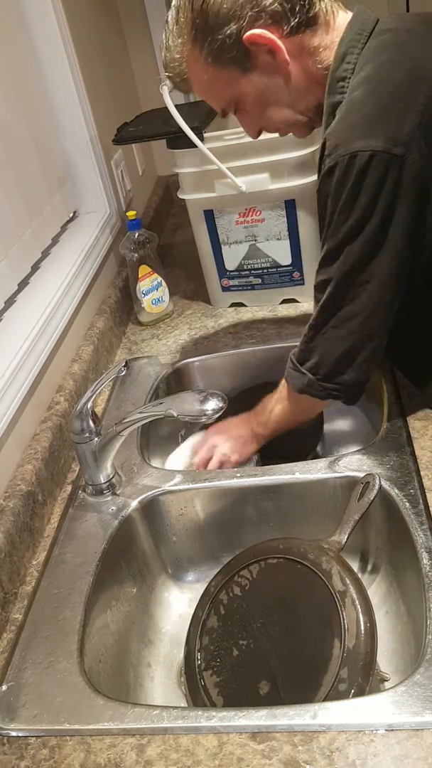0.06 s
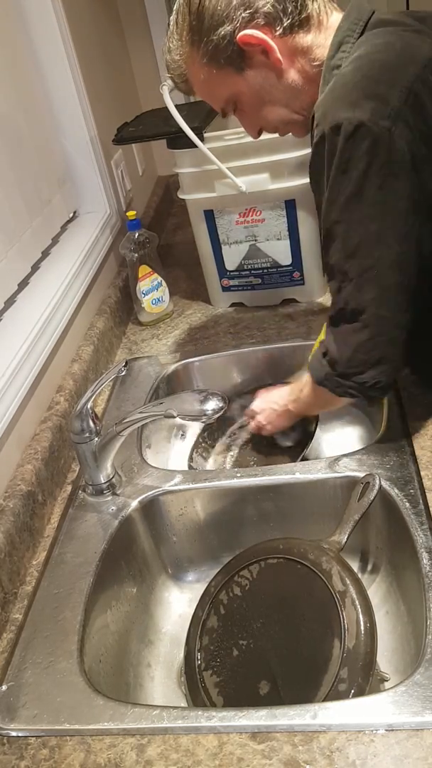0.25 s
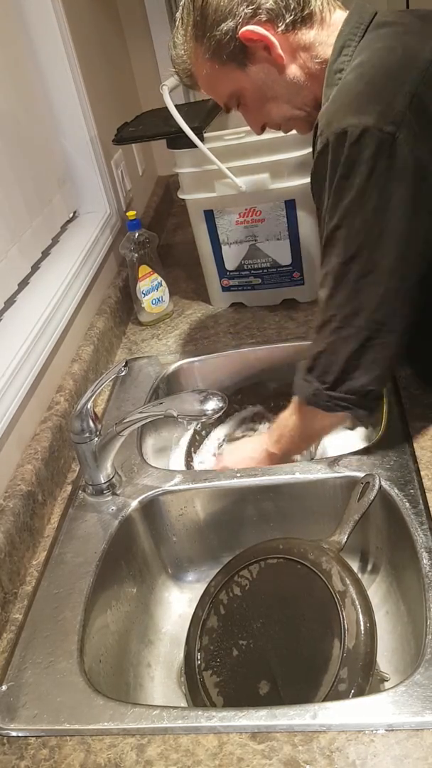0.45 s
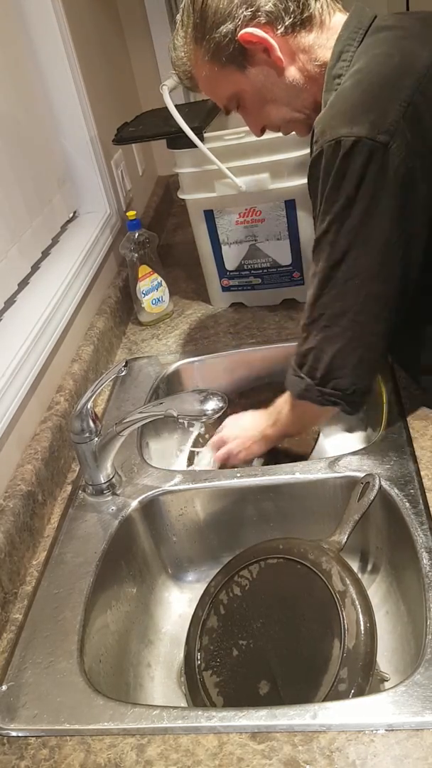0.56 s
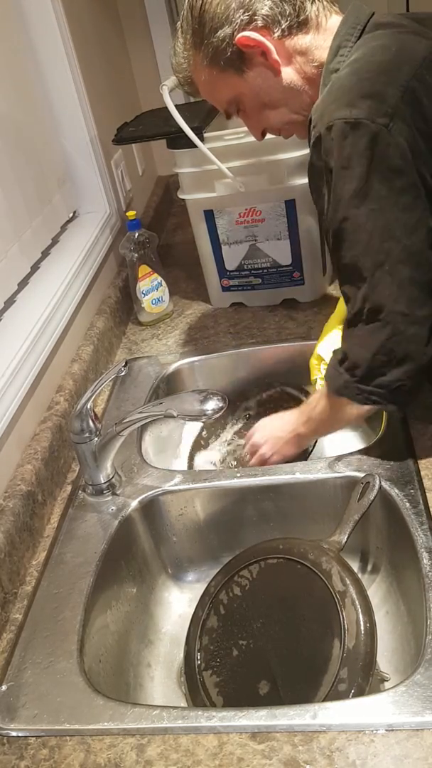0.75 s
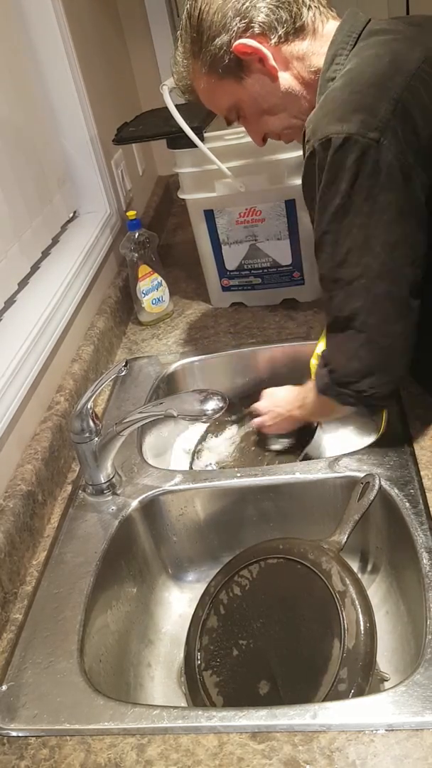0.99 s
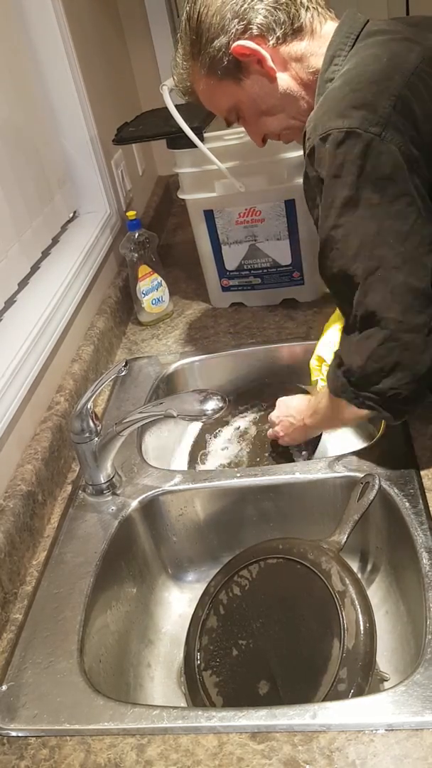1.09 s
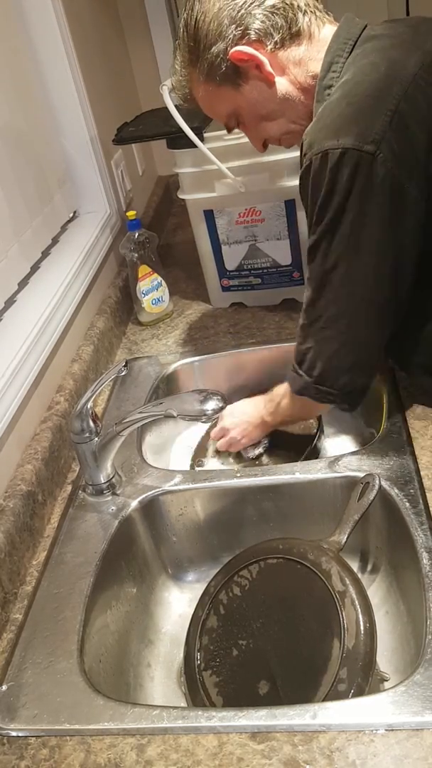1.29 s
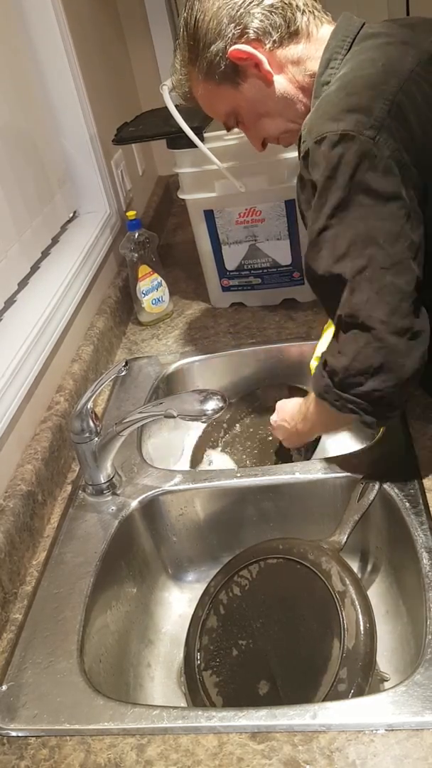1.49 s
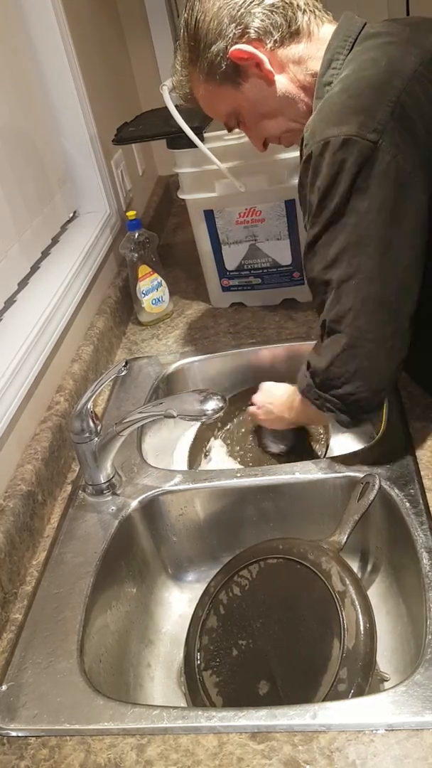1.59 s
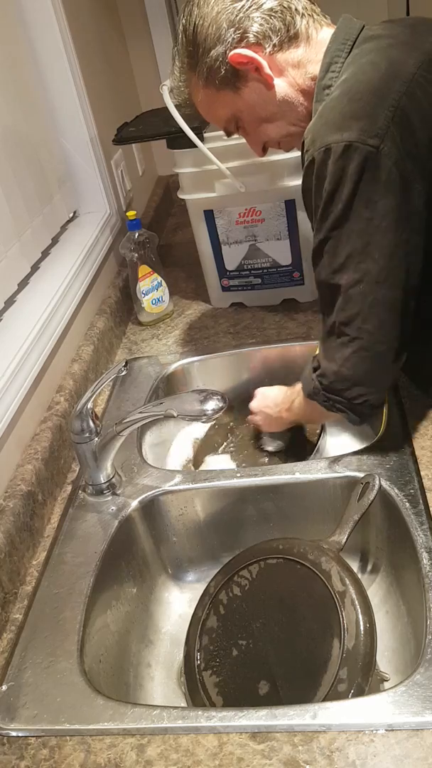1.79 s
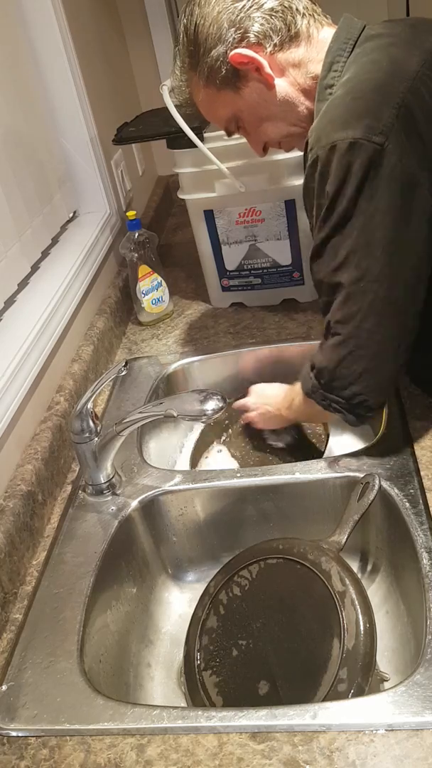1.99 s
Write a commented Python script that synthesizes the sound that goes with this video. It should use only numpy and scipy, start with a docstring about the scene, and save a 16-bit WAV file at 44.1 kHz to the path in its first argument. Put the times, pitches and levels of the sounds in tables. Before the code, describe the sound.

A cast iron pan is scrubbed hard with a wire pad, knocking in a steel sink

```python
"""A cast iron pan is scoured by hand with a wire pad in a steel kitchen sink, heard in stereo for two seconds.
Two weak strokes come first, over a low rumble; near the end of the first one the pan starts to knock
on the basin. Stronger strokes then hiss back and forth: random wire clicks, filtered and swelled stroke by
stroke. Knocks go on as decaying contacts that ring the basin and its clatter, with swelling low sines as the
boom. After the last knock, strokes and rumble remain while room echoes and boom die away."""
import sys
import numpy as np
from scipy import signal
from scipy.fft import rfft, irfft, next_fast_len
from scipy.io import wavfile

SR = 44100
rng = np.random.default_rng(int(sys.argv[2]) if len(sys.argv) > 2 else 0)


def boost(x):
    """Linear amplitude factor 10**(x/20) for a level x in decibels (scalar or array-like)."""
    u = np.asarray(x, float) / 20
    return 10 ** u


def store_wav(level_fs):
    """Save 16-bit WAV to argv[1]."""
    pcm = np.round(np.clip(np.atleast_2d(level_fs), -1, 1) * 32767)
    wavfile.write(sys.argv[1], SR, pcm.T.astype(np.int16))


N = 90404   # samples
HZ = np.fft.rfftfreq(N, 1 / SR) + 1   # frequency grid, shifted 1 Hz to keep clear of log(0)
LEFT_RIGHT = np.array([[1], [-1]])


def rms_one(x):
    """Scales to rms 1."""
    return x / np.sqrt(np.mean(x ** 2) + 1e-20)


def in_time(rows):
    """Interpolates the columns of a table of times, sample by sample."""
    seconds, *columns = np.transpose(rows)
    return [np.interp(np.arange(N) / SR, seconds, column) for column in columns]


def at_hz(points):
    """Interpolates a table of frequencies over log frequency."""
    hz, values = np.transpose(points)
    return np.interp(np.log(HZ), np.log(hz), values)


def drift(rate_hz):
    """Random wander of rms 1: noise through a two-pole lowpass, drawn at every 40th sample."""
    r = np.exp(-2 * np.pi * rate_hz * 40 / SR)
    noise = rng.standard_normal(N // 40 + 2002)
    slow = signal.lfilter([1], [1, -2 * r, r * r], noise)[2000:]   # settled part
    return np.interp(np.arange(N) / 40, np.arange(len(slow)), rms_one(slow))


def grains(rate_per_s, spread_db):
    """Two unrelated streams of random clicks of uneven size and either sign."""
    sizes = boost(spread_db * np.minimum(rng.exponential(1, (2, N)), 5))
    sizes = sizes * rng.choice([-1, 1], (2, N))
    return rms_one(sizes * (rng.random((2, N)) < rate_per_s / SR))


def causal(spectrum):
    """Minimum-phase response for a spectrum in dB, by folding its cepstrum."""
    cepstrum = irfft(at_hz(spectrum) * np.log(10) / 20, N)
    cepstrum[1:N // 2] *= 2
    cepstrum[N // 2 + 1:] = 0
    return np.exp(rfft(cepstrum))


# How alike left and right sound. Each row: frequency in Hz, likeness from 0 to 1.
LEFT_RIGHT_LIKENESS = [(60, .99), (130, 0.53), (300, 1), (600, 0.74), (1500, 0.21), (4000, 0.2),
                       (12000, 0.022)]


def colour(pair, spectrum):
    """Filters two streams to a spectrum and mixes them as middle and side to set the stereo width."""
    mid, side = rfft(pair) * causal(spectrum)
    alike = np.clip(at_hz(LEFT_RIGHT_LIKENESS), 0, 1)
    return irfft(np.sqrt(1 + alike) * mid + np.sqrt(1 - alike) * side * LEFT_RIGHT, N)


# Spectrum of the dragged and pressed pan. Each row: frequency in Hz, density in dB per Hz (relative).
RUMBLE_SPECTRUM = [(15, -30), (25, 16), (146, 2), (189, -6.5), (260, 13.5), (306, 1), (629, -2),
                   (784, -5.5), (1100, -1.5), (1220, -5), (3000, -14), (3900, -23), (6600, -120)]


def rumble():
    """The pan is dragged and pressed on the basin: low filtered noise with a slightly wandering level."""
    level_db = -50 + 1.03 * drift(8.4)
    return boost(level_db) * rms_one(colour(rng.standard_normal((2, N)), RUMBLE_SPECTRUM))


# The basin floor flexes under the load.
# Each row: time in seconds, low mode in dB, second mode in dB, sway in dB (rms before flutter and pan).
FLOOR_FLEXING = [(0.0, -49.5, -44, -45.5), (0.1, -52.5, -70, -52), (0.222, -50, -58, -52),
                 (0.24, -41, -21.5, -26), (0.28, -25.5, -46, -40), (0.34, -37, -30, -44),
                 (0.38, -39, -38.5, -32), (0.44, -38.5, -53, -61), (0.51, -38.5, -49, -37),
                 (0.59, -50.5, -52, -67), (0.71, -71, -70, -59), (0.736, -31, -27, -51),
                 (0.8, -40, -37, -37), (0.83, -28.5, -54, -54), (0.86, -29.5, -36.5, -39),
                 (0.95, -40.5, -64, -62), (1.058, -70, -55, -62), (1.078, -48, -27.5, -39),
                 (1.13, -30.5, -36, -42), (1.17, -27.5, -44, -58), (1.25, -28, -54, -58),
                 (1.3, -44, -57, -66), (1.41, -59, -50.5, -50), (1.44, -39, -45, -58),
                 (1.472, -23, -33.5, -50), (1.51, -53, -44.5, -30), (1.57, -26, -39.5, -46),
                 (1.64, -40.5, -39.5, -35), (1.725, -44, -55, -62), (1.77, -43, -57.5, -59),
                 (2.05, -62.5, -59, -58)]


def boom():
    """The lowest modes of the basin swell as the pan rocks: sines wavering a little in pitch and level."""
    LOW_HZ, SECOND_HZ, SWAY_HZ = 71.1, 130.1, 47.5
    PITCH_WAVER, FLUTTER_DB = 0.024, 2.2   # waver as a share of the frequency
    pans_db = (0, -3, 0)   # left minus right
    out = 0
    for level_db, hz, pan_db in zip(in_time(FLOOR_FLEXING), (LOW_HZ, SECOND_HZ, SWAY_HZ), pans_db):
        level = boost(level_db + pan_db / 2 * LEFT_RIGHT + FLUTTER_DB * drift(25.0))
        phase = 2 * np.pi * np.cumsum(hz * (1 + PITCH_WAVER * drift(5.86))) / SR
        out = out + np.sqrt(2) * level * np.sin(phase)
    return out


def kitchen(x):
    """The room answers: 16 feedback delays, eight per side, each duller on every round."""
    T60_S, WALL_CUT_HZ = 0.48, 1280   # longest decay, at low frequencies
    size = next_fast_len(N + SR)
    w = 2 * np.pi * np.fft.rfftfreq(size)   # radians per sample
    wall = 1 / (1 + 1j * w * SR / (2 * np.pi * WALL_CUT_HZ))
    out = np.zeros((2, len(w)), complex)
    for k, lag in enumerate(rng.uniform(0.0096, 0.03, 16) * SR):
        loop = boost(-60 * lag / SR / T60_S) * wall * np.exp(-1j * w * lag)
        out[k % 2] += loop / (1 - loop) * (-1) ** (k // 2)
    echoes = irfft(out * rfft(x, size), size)[:, :N]
    return signal.sosfilt(signal.butter(2, 450.0, "high", fs=SR, output="sos"), echoes)


def ring(x, hz, t60_s):
    """A two-pole resonator: a unit click sets a decaying sine of starting height 1 ringing."""
    r, w = boost(-60 / (t60_s * SR)), 2 * np.pi * hz / SR
    return signal.lfilter([0, np.sin(w)], [1, -2 * r * np.cos(w), r * r], x + 1e-18)


# Modes of pan and basin. Each entry: frequency in Hz.
MODE_HZ = [105, 160, 226, 258, 317, 375, 436, 472, 528, 609, 711, 855, 958, 1000, 1110, 1272, 1555, 1770,
           2050]
# The same modes in order. Each row: level in dB (relative), t60 in seconds, left minus right in dB.
MODE_RINGING = [(-8, 0.29, 6), (-2, 0.033, 5), (-14.5, 0.31, 0.5), (-11.5, 0.16, -1), (-4.5, 0.17, 2.5),
                (-22.5, 0.067, 12), (-9, 0.1, -5), (-14, 0.098, -4), (-18.5, 0.081, 17), (-10, 0.15, -6.5),
                (-18, 0.027, 20.5), (-17, 0.033, -21.5), (-18, 0.058, 7), (-22.5, 0.15, -6),
                (-19, 0.067, -9.5), (-21, 0.092, 17), (-26, 0.076, -20), (-26.5, 0.04, 16),
                (-25, 0.024, -17)]


def ringing_modes(drive):
    """Pan and basin ring at their modes; the side stream leans in opposite directions on successive modes."""
    out = 0
    for k, (hz, (db, t60_s, pan_db)) in enumerate(zip(MODE_HZ, MODE_RINGING)):
        lean = min(hz / 1090.0, 1) * (-1) ** k   # wider towards the treble
        mid, side = ring(drive, hz, t60_s)
        out = out + boost(-27.5 + db + pan_db / 2 * LEFT_RIGHT) * (mid + lean * side * LEFT_RIGHT)
    return out


# Pan knocks on the basin. Each row: start in seconds, driving level in dB, rattle t60 in seconds,
# brightness in dB, rise time constant in seconds, crack in dB relative to the driving level.
PAN_KNOCKS = [(0.2316, -17, 0.064, 4, 0.0035, -24), (0.245, -22.5, 0.14, 6, 0.0095, -44),
              (0.302, -29.5, 0.24, -1, 0.0014, -40), (.435, -29, 0.1, -5, 0.0094, -30),
              (0.719, -21, 0.19, 3, 0.0041, -19.5), (.785, -27.5, 0.15, 5, 0.0052, -17.5),
              (0.855, -36, 0.044, -23, 0.0052, -28), (1.068, -19, 0.14, 1.5, 0.0035, -25),
              (1.139, -24.5, 0.18, 1, 0.0087, -11.5), (1.258, -39, 0.073, -11, 0.0048, -25),
              (1.422, -26, 0.13, 0.5, 0.0053, -26), (1.455, -29, 0.13, -18, 0.011, -9),
              (1.526, -28.5, 0.2, -2, 0.008, -32), (1.547, -45.5, 0.13, 16.5, 0.014, -29),
              (1.598, -27, 0.085, -2.5, 0.0087, -13), (1.741, -29.5, 0.12, -10, 0.014, -31)]
# Unpitched part of a knock. Each row: frequency in Hz, density in dB per Hz (relative).
CLATTER_SPECTRUM = [(20, -41), (40, -14), (130, -5.5), (200, -4.5), (330, -5), (600, -6), (700, -51.5),
                    (880, -8), (1000, -14.5), (1400, -30), (2500, -24), (9000, -64), (16000, -39)]


def knocks(stroke_gains):
    """A hard first contact, a crack and a dying rattle ring modes and clatter; the pad stirs modes faintly."""
    RATTLE_PER_S, RATTLE_SPREAD_DB = 500, 1.9
    FIRST_CONTACT, CRACK_T60_S = 4.3, 0.16
    CLATTER_DB, PAD_INTO_MODES_DB = -11, -6.5
    t = np.arange(N) / SR
    contacts = grains(RATTLE_PER_S, RATTLE_SPREAD_DB) + 0.25 * rng.standard_normal((2, N))
    first = (np.array(PAN_KNOCKS)[:, 0] * SR).astype(int) + 110   # 2.5 ms into the rise
    contacts[:, first] = FIRST_CONTACT * np.array([[1], [0.3]])
    dull = signal.lfilter([0.1], [1, -0.9], contacts)
    bright = contacts - dull

    force, crack = np.zeros((2, N)), np.zeros(N)
    for start, db, t60_s, bright_db, rise_s, crack_db in PAN_KNOCKS:
        age = np.maximum(t - start, 0)
        rise = 1 - np.exp(-age / max(rise_s, 3e-4))
        decay = boost(db - 60 * age / max(t60_s, 0.01))
        force += decay * rise * (dull + boost(bright_db) * bright)
        crack += boost(db + crack_db - 60 * age / CRACK_T60_S) * rise

    coarse_gain = stroke_gains[2]
    drive = force + boost(PAD_INTO_MODES_DB) * coarse_gain * rng.standard_normal((2, N))
    modes = ringing_modes(drive)
    scale = np.sqrt(np.mean(boost(at_hz(CLATTER_SPECTRUM)) ** 2))
    clatter = boost(CLATTER_DB) / scale * colour(force, CLATTER_SPECTRUM)
    # the crack has the spectrum of wire on iron
    crack_noise = rms_one(colour(rng.standard_normal((2, N)), SCOUR_SPECTRUM))
    return modes + clatter + crack * crack_noise


# Strokes of the pad. Each row: start in seconds, end in seconds, level in dB, fine hiss in dB
# and coarse rasp in dB (both relative to that level), fastest moment as a share of the stroke.
PAD_STROKES = [(0.028, 0.254, -70, -2, 21, 1), (0.253, 0.456, -55.5, 7, 8, 1),
               (0.421, 0.639, -41, 0.8, -6.5, 0.65), (0.592, 0.713, -47.5, -2.5, 1, 0.56),
               (0.687, 0.79, -47.5, 3, 3.5, 0.37), (0.75, 1.061, -42.5, 0, 0, 0.32),
               (1.034, 1.127, -47.5, 6, 3.5, 0.51), (1.09, 1.246, -46.5, 1, 8, 0.38),
               (1.241, 1.44, -42, 2, -0.4, 0.26), (1.438, 1.655, -42.5, 1.3, -0.5, 0.3),
               (1.643, 1.85, -41.5, 5, 0.5, 0.49), (1.847, 2.043, -44, 4, -2.5, 0.32)]


def pad_strokes():
    """Each stroke speeds up and slows to a halt; returns gains of the middle, fine and coarse bands."""
    RESTING_DB = -54.5
    # exponents of the swell: the fine hiss needs speed, so it swells more narrowly
    fullness = np.array([[0.52], [0.82], [0.52]])
    t = np.arange(N) / SR
    power = np.full((3, N), boost(RESTING_DB) ** 2)
    for start, end, db, fine_db, coarse_db, fastest in PAD_STROKES:
        peak = start + np.clip(fastest, 0.05, 0.95) * (end - start)
        part = np.interp(t, [start, peak, end], [0, 0.5, 1])
        swell = np.abs(np.sin(np.pi * part)) ** fullness
        moving = (part > 0) * (part < 1)
        level = boost(db + np.array([[0], [fine_db], [coarse_db]]))
        power += (level * swell * moving) ** 2
    return np.sqrt(power)


# Spectrum of wire on iron. Each row: frequency in Hz, density in dB per Hz (relative).
SCOUR_SPECTRUM = [(590, -39), (1000, -39), (1160, -13), (1320, -2), (1580, -3), (2060, -0.5), (2230, -4),
                  (2530, -0.5), (2840, -2), (3490, -2.5), (4760, -3.5), (5920, -0.5), (8250, -21.5),
                  (9360, -9), (15500, -14)]


def scouring(stroke_gains):
    """Thousands of wire tips catch on the iron; each stroke has its own balance of fine and coarse."""
    GRAINS_PER_S, GRAIN_SPREAD_DB, FLICKER_DB = 9000, 0.8, 1.1
    FINE_HZ, COARSE_HZ = 6400, 2800   # edges of the fine hiss and the coarse rasp
    whole = rfft(rms_one(colour(grains(GRAINS_PER_S, GRAIN_SPREAD_DB), SCOUR_SPECTRUM)))
    fine = 1 / (1 + (FINE_HZ / HZ) ** 8)
    coarse = 1 / (1 + (HZ / COARSE_HZ) ** 4)
    out = 0
    for share, gain in zip((1 - fine - coarse, fine, coarse), stroke_gains):
        out = out + irfft(whole * share, N) * gain * boost(FLICKER_DB * drift(26))
    return out


def scene():
    """Rumble, boom, knocks with the room's answer, and the scouring pad."""
    KITCHEN_DB = -15.5
    stroke_gains = pad_strokes()
    hits = knocks(stroke_gains)
    room = boost(KITCHEN_DB) * kitchen(hits)
    return rumble() + boom() + hits + room + scouring(stroke_gains)


def band_limit(x):
    """A steep low-pass at the top of the band."""
    return signal.sosfilt(signal.butter(12, 16560, fs=SR, output="sos"), x)


# Level balance of left and right by frequency. Each row: frequency in Hz, left minus right in dB.
CHANNEL_BALANCE = [(60, -2.5), (140, -2.5), (250, -0.7), (1800, 1), (4200, -1), (5600, -4), (6400, -11),
                   (7000, 12), (7300, 6), (8300, 18), (8800, 6.5), (11000, 8), (15000, 10)]


def record(dry):
    """The balance of left and right varies with frequency; the deep bass and the top are cut."""
    LOW_CUT_HZ, TOP_CUT_HZ = 50, 15850
    balance = boost(at_hz(CHANNEL_BALANCE) / 2 * LEFT_RIGHT)
    bass_cut = 1 / np.sqrt(1 + (LOW_CUT_HZ / HZ) ** 6)
    mix = irfft(rfft(dry) * balance * bass_cut * (HZ < TOP_CUT_HZ), N)
    return band_limit(mix)


dry = scene()
out = record(dry)
store_wav(out)
```